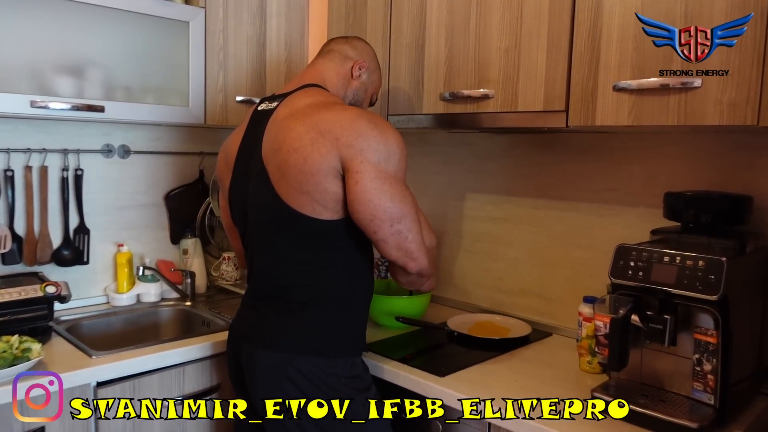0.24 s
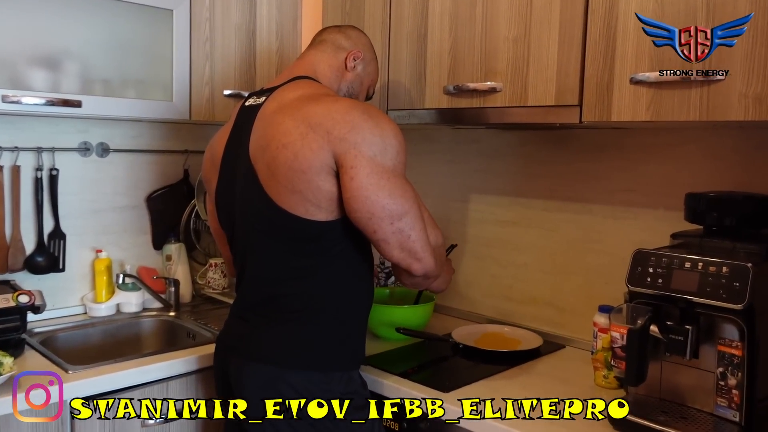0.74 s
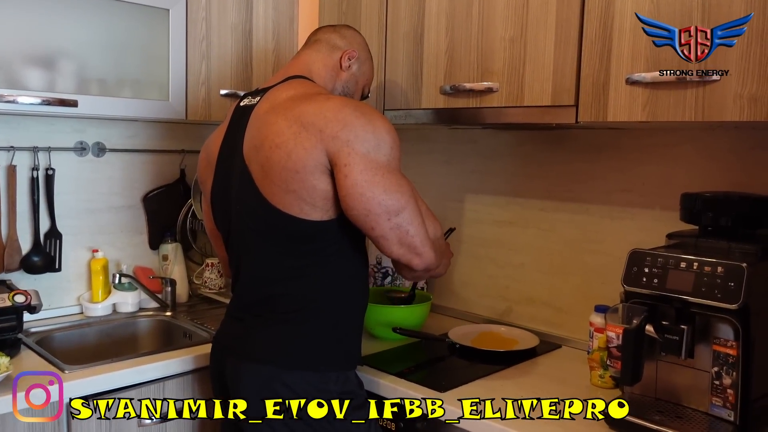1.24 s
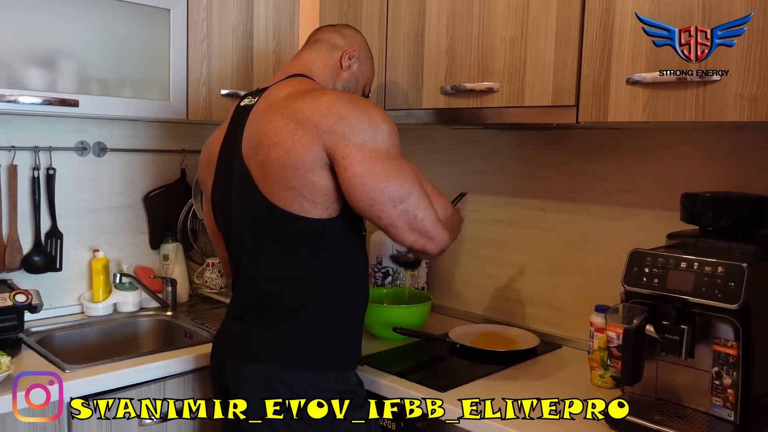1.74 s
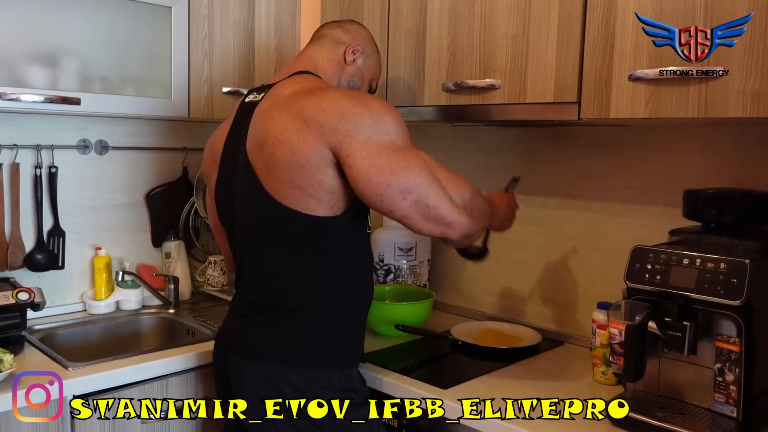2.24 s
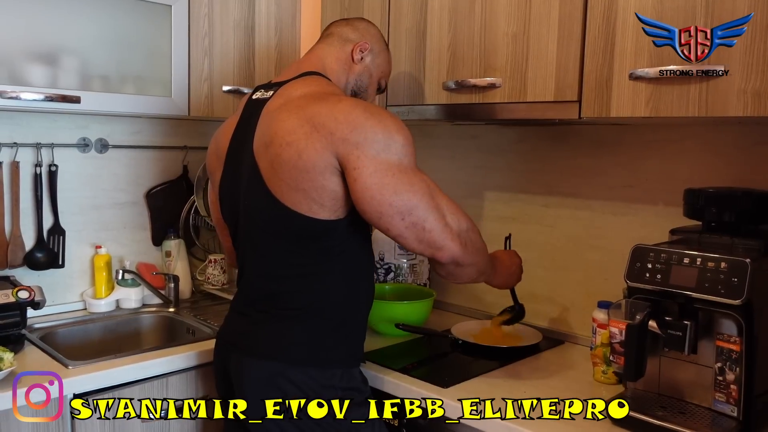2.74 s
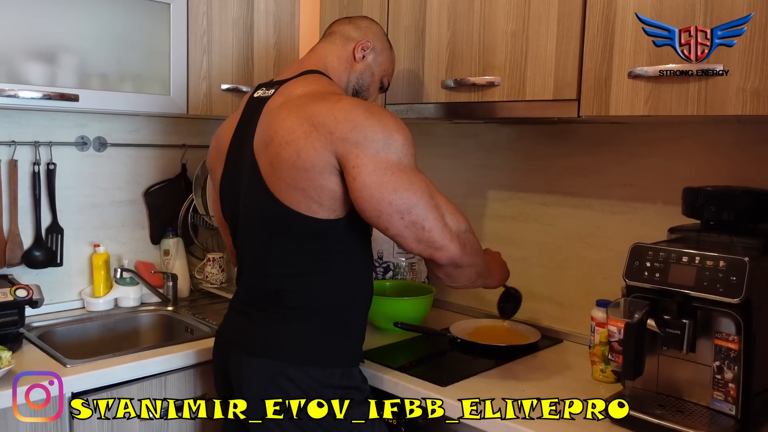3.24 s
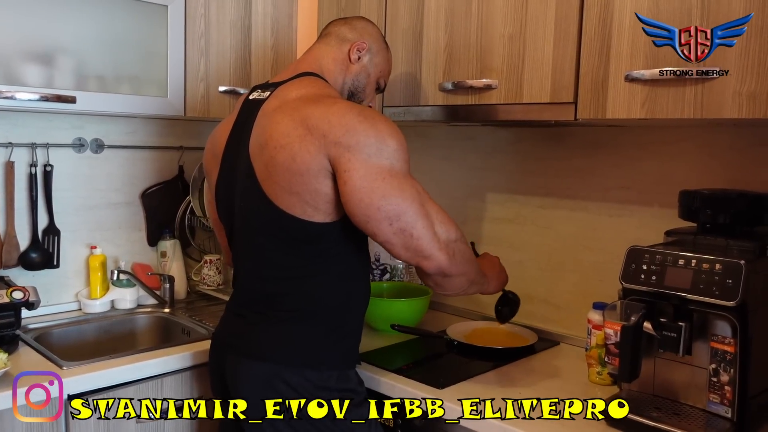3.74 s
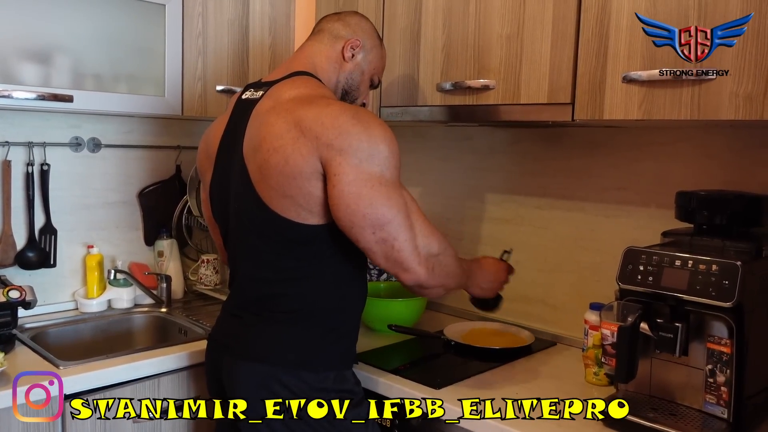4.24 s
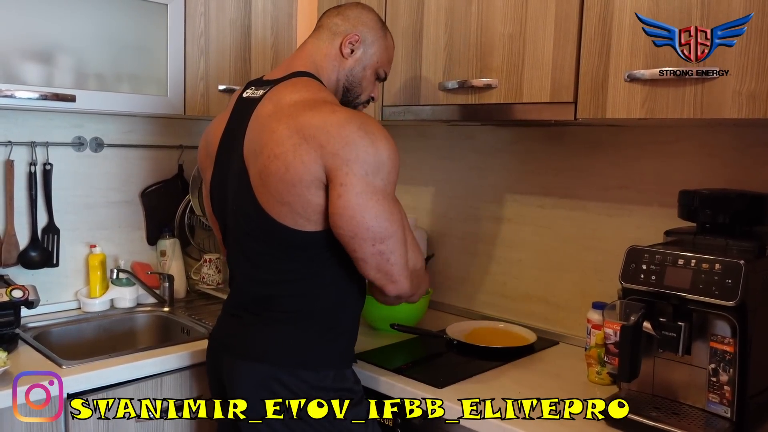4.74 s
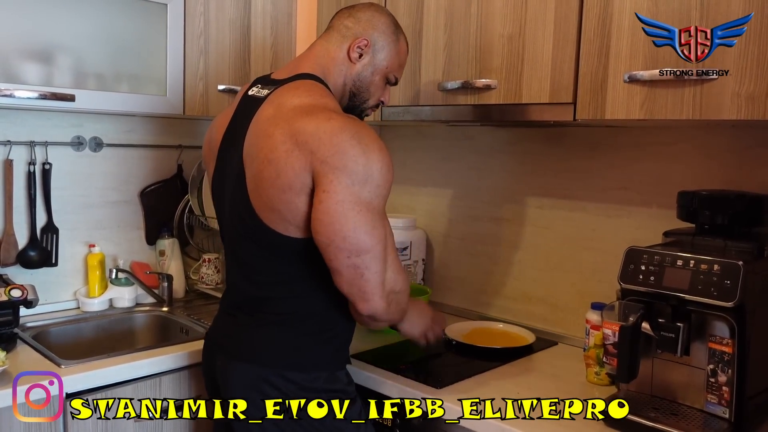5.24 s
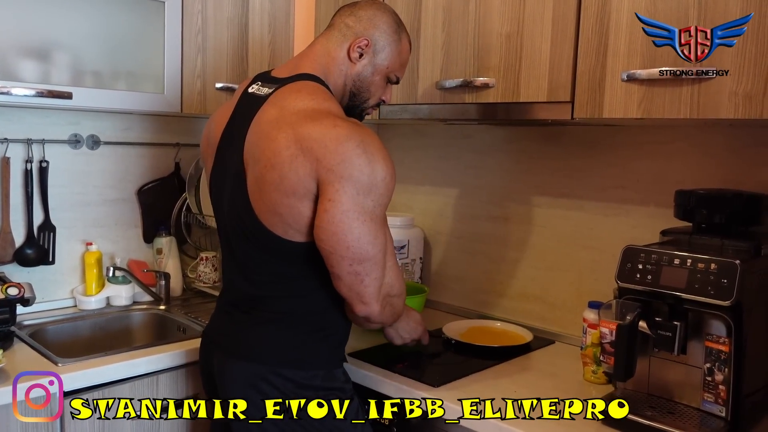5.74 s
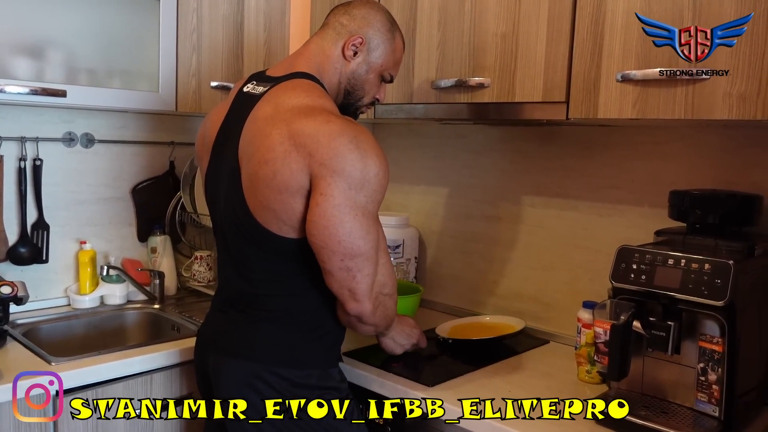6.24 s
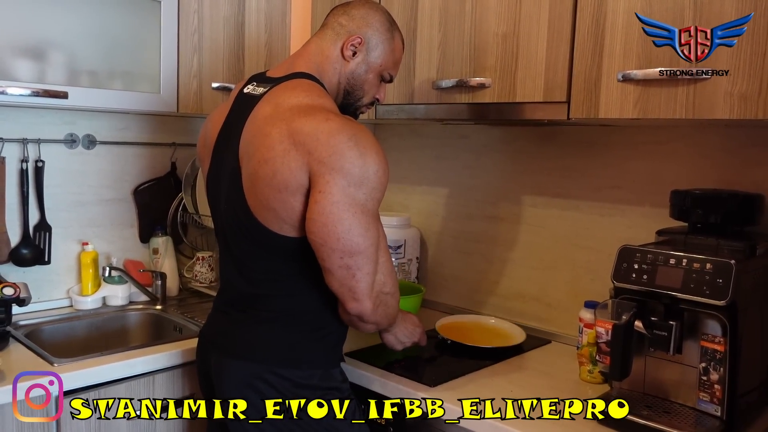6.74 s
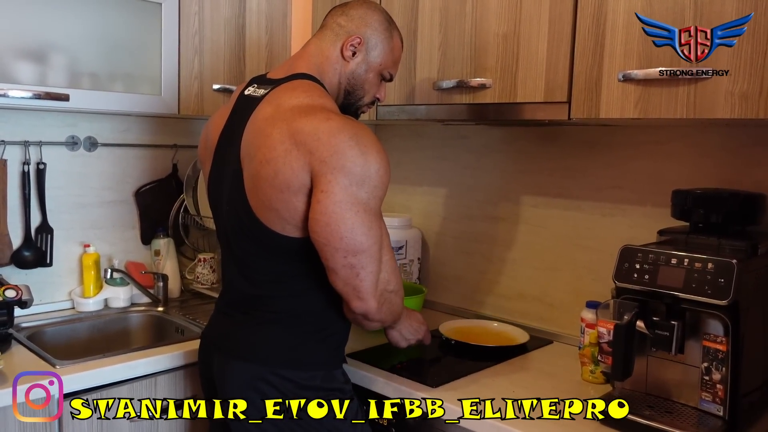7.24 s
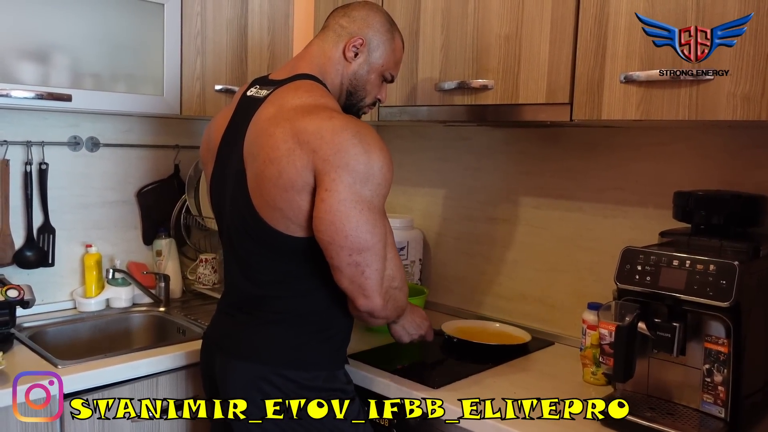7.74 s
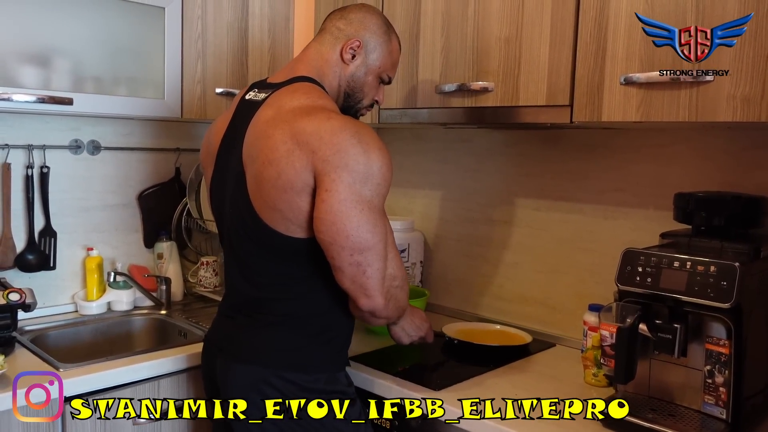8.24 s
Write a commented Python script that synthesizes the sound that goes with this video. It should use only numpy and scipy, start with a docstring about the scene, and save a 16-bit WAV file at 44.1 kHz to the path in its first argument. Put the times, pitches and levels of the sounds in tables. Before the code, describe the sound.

In a small kitchen with short echoes, a close microphone picks up fat crackling and hissing over a steady fan hum. The sizzle surges twice as batter is ladled in, with light taps and a faint squeal of steam. It eases, and the ladle drops into its bowl with a sharp double clack. A few pan knocks on the glass hob follow, one loud, along with another swell of sizzling.

```python
"""A small kitchen, a stereo microphone close to a hot frying pan, a fan humming behind it.
Batter sizzles as thousands of tiny steam bubbles burst; fat spits, the ladle sloshes, scrapes and taps.
A drip and then a ladleful hit the fat and flare up, and steam whistles out from under the batter.
The ladle is dropped back in its bowl, and the pan is tilted to spread the batter and knocks
down on the glass hob. Worktop, cupboards and walls throw back short echoes."""
import sys
import numpy as np
from scipy import signal
from scipy.fft import rfft, irfft
from scipy.io import wavfile
from scipy.ndimage import uniform_filter1d

SR = 44100
rng = np.random.default_rng(int(sys.argv[2]) if len(sys.argv) > 2 else 0)


def master_out(mix):
    """Clip the mix to full scale and print it as 16-bit PCM to the path in sys.argv[1]."""
    frames = np.transpose(np.atleast_2d(mix))
    ceiling = np.clip(frames, -1, 1)
    pcm = np.round(ceiling * 32767).astype(np.int16)
    wavfile.write(sys.argv[1], SR, pcm)


N = 374850
TIME = np.arange(N) / SR

# The kitchen's reverberation: (frequency [Hz], t60 [s])
KITCHEN_DECAY = [(100, 0.97), (400, 0.69), (1500, 0.45), (4000, 0.42), (9000, 0.53), (16000, 0.46)]
# Fan air and the quiet hiss of the pan: (frequency [Hz], relative level [dB])
AIR_SPECTRUM = [(20, -30), (70, -26), (125, -15), (190, -7.5), (290, 1.5), (420, -2), (540, -12.5),
                (950, -16), (1700, -9.5), (2450, -17.5), (5400, -7), (8000, -15), (11000, -17.5),
                (15700, -24.5)]
# Resonances of the fan and its duct: (frequency [Hz], width [Hz], level [dB])
FAN_RESONANCES = [(333.4, 27.6, -46.5), (353.6, 4.5, -54.5), (190, 6.8, -67.5), (421, 15, -58.5),
                  (513, 13, -69.5), (1175, 110, -61.5), (1321, 64, -59), (2936, 460, -57), (3390, 220, -61),
                  (5110, 210, -57.5), (12150, 600, -60)]
# Swells of sizzle from batter on hot fat, and the ladle sloshing through batter near 0.8 s;
# fizz and sputter are boosts before weighting by band:
# (time [s], level [dB], rise [s], hold [s], fade [dB/s], fine fizz [dB], low sputter [dB])
SWELLS = [(-.3, -37.5, 0.083, 0.23, 12.5, 1.5, 9.5), (.78, -46, .05, 0.25, 17, -12, 25.5),
          (1.494, -43.5, 0.19, .05, 14, -8, 13), (2.228, -31.5, 0.04, 0.02, 34, 1.5, 10.5),
          (2.553, -44.5, 0.13, 0.42, 8, -4, 15), (2.998, -31, .045, 0.12, 24, -8, 3.5),
          (3.5, -48.5, 0.13, 0.18, 45, 4, 10), (4.298, -48.5, 0.073, .35, 9, -4, 7),
          (5.35, -47, .1, .1, 11, -6, 22), (6.153, -35, 0.13, 0.15, 45, -5, 10),
          (6.546, -42.5, 0.058, 0.1, 4, 2, 8)]
# Colour of the bursting steam bubbles: (frequency [Hz], relative level [dB])
SIZZLE_SPECTRUM = [(100, -55), (600, -18), (1000, -16.5), (1330, -14), (2020, -9.5), (2430, -11.5),
                   (3520, -3), (4500, -2), (5720, -0.5), (7600, -3), (9200, -4), (11000, -6), (13000, -6.5),
                   (15800, -10)]
# Fat spitting, and light bumps, scrapes and taps of the ladle:
# (time [s], relative level [dB], pitch [Hz], decay [cycles])
SMALL_CLICKS = [(.02, -18, 3050, .7), (.194, -25, 756, 1.1), (.222, -27, 623, 0.72),
                (.218, -18.5, 3170, .7), (.625, -21, 9000, .3), (.84, -23, 7050, 0.44),
                (.927, -20.5, 2600, .47), (1.735, -20, 8000, 0.24), (2.282, -19, 3540, 4),
                (2.49, -16, 4380, 0.62), (2.797, -12.5, 3400, 0.37), (2.902, -16.5, 12000, 0.46),
                (2.945, -22, 11000, .4), (3.24, -18, 12000, .6), (4.741, -16, 9000, .36),
                (4.745, -17, 3420, 0.37), (8.15, -26, 13000, 2)]
# The ladle landing in its bowl:
# (time [s], relative level [dB], contact [ms], first bounce after [s], bounce against blow [dB])
LADLE_LANDINGS = [(1.06, -37, 0.18, .04, -8), (1.22, -22, .17, 0.03, -12), (4.975, -27.5, .067, .02, -18),
                  (5.1025, 3.5, 0.079, .04, -7.5), (5.215, 6, .17, .057, -5)]
# Clack of ladle and bowl: (frequency [Hz], gain [dB])
LADLE_CLACK = [(40, -22), (110, -13.5), (220, -1), (450, -3), (600, -0.5), (850, -0.5), (1080, -7.5),
               (1450, 4.5), (2200, 0.5), (2620, 2.5), (3150, -10), (5500, -5), (10000, -8.5), (16000, -14)]
# Ring of ladle and bowl: (frequency [Hz], relative level [dB], t60 [s])
LADLE_RING = [(199, -42, .18), (334, -40, .21), (565, -38, .1), (813, -44, .18), (940, -40, .1),
              (1287, -36, .17), (1400, -29, .25), (1560, -32, .07), (1776, -30, .06), (2540, -35, .08)]
# Steam squeezing out under the poured batter: (time [s], level [dB], half length [s])
STEAM_JETS = [(3.056, -42, .02), (3.205, -33.5, 0.031), (3.3, -44, .1), (3.4, -32.5, 0.012),
              (3.498, -42.5, 0.054)]
# The pan meeting the hob:
# (time [s], relative level [dB], contact [ms], first bounce after [s], bounce against blow [dB])
PAN_LANDINGS = [(5.69, -16.5, 0.28, 0.036, -9), (5.89, -25, .22, 0.018, -21), (6.278, -7, 0.3, 0.033, -10),
                (6.646, 7.5, 0.09, 0.039, -10), (7.704, -18, 0.042, .03, -17), (8.403, -1, 1.6, 0.039, -1),
                (8.485, -1, 1.2, .04, -8)]
# Clack of the pan on glass: (frequency [Hz], gain [dB])
PAN_CLACK = [(40, -13), (95, -17), (140, -5), (280, 4), (480, -2), (660, 1), (900, -0.5), (1200, 3),
             (2800, 5), (3800, 0.5), (5000, -7.5), (7500, -14), (16000, -61)]
# Ring of the pan: (frequency [Hz], relative level [dB], t60 [s])
PAN_RING = [(253, -40, .35), (355, -41, .3), (646, -41, .25), (820, -43, .3), (1015, -43, .3),
            (1125, -39, .3), (1345, -41, .3), (1749, -41, .3), (1836, -40, .33), (2050, -42, .3),
            (2195, -38, .33), (2432, -40, .3), (2750, -41, .28), (2853, -38, .2), (3101, -42, .22),
            (3591, -35, .11)]
# Stereo width at the microphone: (frequency [Hz], side gain [dB])
SIDE_GAIN = [(100, -5), (300, -19), (600, -4), (2000, -8), (4500, -8), (9000, -8.5), (15000, -10.5)]


def amp(db):
    return 10 ** (np.asarray(db) / 20)


def unit_rms(x):
    return x / np.sqrt(np.mean(x ** 2) + 1e-20)


def curve_at(points, hz):
    point_hz, value = np.transpose(points)
    return np.interp(np.log(hz + 1), np.log(point_hz + 1), value)


def add_at(mix, s, sound):
    part = mix[round(s * SR):][:len(sound)]
    part += sound[:len(part)]


def coloured(x, points):
    """Filters by a spectrum in dB."""
    size = x.shape[-1]
    return irfft(rfft(x) * amp(curve_at(points, np.fft.rfftfreq(size, 1 / SR))), size)


def minimum_phase(db):
    """The briskest impulse response with this gain over the full circle of frequencies."""
    return np.fft.ifft(np.exp(np.conj(signal.hilbert(np.log(amp(db)))))).real


def noise_band(hz, width_hz):
    """Mid and side noise through a steep resonance that follows the curve hz."""
    turn = np.exp(2j * np.pi * np.cumsum(hz * np.ones(N)) / SR)
    pole = np.exp(-np.pi * width_hz / SR)
    band = signal.lfilter([(1 - pole) ** 2], [1, -2 * pole, pole ** 2], rng.standard_normal((2, N)) / turn)
    return unit_rms((turn * band).real)


def kitchen(x, wet_db, near_db, near_t60=0.045):
    """Direct sound, dense echoes off worktop and cupboards, and the room's tail; gives mid and side."""
    t = np.arange(SR // 2) / SR
    early, late = rng.choice([-1, 1], (2, 2, len(t))) * (rng.random((2, 2, len(t))) < .2)
    near = early * amp(-60 * t / near_t60)
    hz, age, spectra = signal.stft(late, SR, nperseg=256)
    decay = amp(-60 * age / curve_at(KITCHEN_DECAY, hz)[:, None])
    tail = signal.istft(spectra * decay, SR, nperseg=256)[1][:, :len(t)]
    tail *= 1 - np.exp(-t / 0.0072)
    echo = amp(near_db) * near / np.linalg.norm(near[0]) + amp(wet_db) * tail / np.linalg.norm(tail[0])
    echo[0, 0] += 1  # the direct path, in the mid only
    # the room spreads sound in time but leaves its broad colour alone
    power = uniform_filter1d(abs(np.fft.fft(echo)) ** 2, size=60, mode="wrap")
    echo = signal.fftconvolve(echo, minimum_phase(-10 * np.log10(power))[:, :2048], axes=1)
    return signal.fftconvolve(x[None], echo, axes=1)[:, :N]


def fan(air_db=-44):
    """Rushing air with the narrow, restless resonances of fan and duct."""
    hz = np.fft.rfftfreq(N, 1 / SR)
    power = (amp(air_db) * unit_rms(amp(curve_at(AIR_SPECTRUM, hz)))) ** 2
    for centre, width, db in FAN_RESONANCES:
        peak = 1 / (1 + (2 * (hz - centre) / width) ** 2)
        power += (amp(db) * unit_rms(peak)) ** 2
    return irfft(rfft(rng.standard_normal((2, N))) * np.sqrt(power), N)


def swell_levels(t, simmer_db=-48.5, sputter_lag_db=31, sputter_lag_s=0.096):
    """The simmer, then each swell as it rises, holds and fades: (level, fizz, sputter) over time."""
    steady = np.ones(len(t))
    layers = [np.outer((simmer_db, -26, 13), steady)]  # little fizz, plenty of sputter
    for s, db, rise_s, hold_s, fade_db_per_s, fizz_db, sputter_db in SWELLS:
        age = np.maximum(t - s, 0)
        risen_db = 20 * np.log10(np.clip(age / rise_s, 1e-5, 1))
        faded_db = fade_db_per_s * np.maximum(age - rise_s - hold_s, 0)
        # big bubbles take time to grow, so a fresh swell lacks low sputter
        young_db = sputter_lag_db * np.exp(-age / sputter_lag_s)
        layers.append([db + risen_db - faded_db, fizz_db * steady, sputter_db - young_db])
    return np.array(layers)


def sizzle(bursts_per_s=5000, spread_db=3.0, flutter_db=1.43):
    """Tiny steam bubbles burst, brighter under fresh batter; one dull swell is the ladle's slosh."""
    size = amp(spread_db * np.minimum(rng.exponential(1, N), 6)) * rng.choice([-1, 1], N)
    bursts = kitchen(size * (rng.random(N) < bursts_per_s / SR), wet_db=-0.5, near_db=3.5)
    hz, t, spectra = signal.stft(unit_rms(coloured(bursts, SIZZLE_SPECTRUM)), SR, nperseg=512)
    fizz_weight = curve_at([(7500, 0.028), (13000, 0.93)], hz)[:, None]
    sputter_weight = curve_at([(2600, 0.53), (4200, 0)], hz)[:, None]
    power = sum(amp(db + fizz_weight * fizz + sputter_weight * sputter) ** 2
                for db, fizz, sputter in swell_levels(t))
    flutter = unit_rms(uniform_filter1d(rng.standard_normal(len(t)), size=5))
    return signal.istft(spectra * np.sqrt(power) * amp(flutter_db * flutter), SR, nperseg=512)[1][:, :N]


def crackle(limit_db=-36, ticks_per_s=60, spread_db=3.0, below_db=-9.5):
    """Single droplets of fat snap above the hiss, louder as it swells, up to a limit."""
    size = amp(spread_db * np.minimum(rng.exponential(1, N), 3.5)) * (rng.random(N) < ticks_per_s / SR)
    ticks = coloured(size * rng.choice([-1, 1], N), [(500, -50), (2500, -2), (6000, -2), (16000, 0)])
    t = TIME[::256]
    level = np.sqrt(sum(amp(db + .5 * fizz) ** 2 for db, fizz, _ in swell_levels(t)))
    swell = amp(below_db) * np.interp(TIME, t, np.minimum(level, amp(limit_db)))
    return kitchen(unit_rms(ticks) * swell, wet_db=-12, near_db=19)


def small_clicks(spray_s=0.0022):
    """Each spit of fat or light touch of the ladle is a short spray of damped clicks."""
    out, t = np.zeros(N), np.arange(SR // 8) / SR
    for s, db, hz, cycles in SMALL_CLICKS:
        click = t * np.cos(2 * np.pi * hz * t) * np.exp(-hz * t / cycles)
        spray = signal.fftconvolve(np.diff(click), rng.standard_normal(len(t)) * np.exp(-t / spray_s))
        add_at(out, s, amp(db) * spray / np.linalg.norm(spray))
    return amp(8.0) * kitchen(out, wet_db=4.5, near_db=12)


def bouncing(landings, edge_s, edge_db, edge_contact, soft_ms, softening, loss_db, gap_ratio=.38):
    """A main blow, another edge's touch, three quickening bounces: (time [s], level [dB], contact [ms])."""
    blows = []
    for s, db, contact_ms, gap_s, bounce_db in landings:
        blows += [(s, db, contact_ms), (s + edge_s, db + edge_db, contact_ms * edge_contact)]
        for k in range(3):
            s += gap_s * gap_ratio ** k
            blows.append((s, db + bounce_db - loss_db * k, contact_ms + soft_ms * softening ** k))
    return blows


def knocks(blows, body, modes, ring_db, chatter, chatter_s=0.0033):
    """Chattering force pulses, duller the longer the contact, drive a short clack and ringing modes."""
    force, t = np.zeros(N), np.arange(SR // 2) / SR
    brief = t[:600]
    for s, db, contact_ms in blows:
        progress = np.pi * brief * 1000 / contact_ms
        push = progress * np.exp(-progress)
        rebounds = rng.standard_normal(len(brief)) * np.exp(-brief / chatter_s)
        rebounds *= chatter / np.linalg.norm(rebounds)
        rebounds[0] += 1
        scatter = irfft(np.exp(1j * np.angle(rfft(rebounds))))  # smears the blow without colouring it
        add_at(force, s, amp(db) * np.convolve(push / push.sum(), scatter))
    clack = minimum_phase(curve_at(body, abs(np.fft.fftfreq(len(t), 1 / SR))))
    ring = sum(amp(db - 60 * t / t60) * np.cos(2 * np.pi * hz * t) for hz, db, t60 in modes)
    return signal.fftconvolve(force, clack + amp(ring_db) * ring)[:N]


def ladle():
    """The ladle clatters into its bowl, each bounce duller than the last, and both ring briefly."""
    blows = bouncing(LADLE_LANDINGS, edge_s=-.0053, edge_db=-4.5, edge_contact=0.49,
                     soft_ms=0.29, softening=1.94, loss_db=0.0)
    clatter = knocks(blows, LADLE_CLACK, LADLE_RING, ring_db=-14.0, chatter=1.37)
    return amp(15.5) * kitchen(clatter, wet_db=3.5, near_db=8.0, near_t60=0.041)


def steam(whistle_hz=5850, rise_hz=490, rise_at_s=3.29, rise_s=0.046, rush_db=-42):
    """Jets whistle and rise as the batter sets, under a brief higher rush while the ladleful spreads."""
    hz = whistle_hz + rise_hz * (1 + np.tanh((TIME - rise_at_s) / rise_s)) / 2
    jets = sum(amp(db) * np.exp(-((TIME - s) / half_s) ** 2) for s, db, half_s in STEAM_JETS)
    whistle = noise_band(hz, width_hz=700)
    rush = noise_band(hz=9200, width_hz=2400)
    spreading = np.interp(TIME, [3.02, 3.06, 3.22, 3.45], [0, 1, 1, 0])
    return whistle * jets + amp(rush_db) * rush * spreading


def pan():
    """The tilted pan knocks and bounces on the glass hob: a clack, a faint ring and plenty of room."""
    blows = bouncing(PAN_LANDINGS, edge_s=.009, edge_db=-12.5, edge_contact=1.5,
                     soft_ms=0.13, softening=0.62, loss_db=0.8)
    clatter = knocks(blows, PAN_CLACK, PAN_RING, ring_db=-32, chatter=0.34)
    return amp(15.5) * kitchen(clatter, wet_db=10.5, near_db=13.5, near_t60=0.14)


def scene(knock_side_db=-6.5, lean_left_db=.2):
    """All sources meet at the microphone as mid and side, the knocks nearly mono; gives left and right."""
    cookware = (ladle() + pan()) * amp([[0], [knock_side_db]])
    mid, side = fan() + sizzle() + crackle() + small_clicks() + steam() + cookware
    side = coloured(side, SIDE_GAIN)
    return np.array([mid + side, mid - side]) * amp([[lean_left_db], [-lean_left_db]])


def record(dry, low_cut_hz=87.6, band_limit_hz=15850):
    """The microphone's bass roll-off and the band limit of the recorder."""
    thin = signal.sosfilt(signal.butter(2, low_cut_hz, "high", fs=SR, output="sos"), dry)
    lowpass = signal.firwin(1023, band_limit_hz, window=("kaiser", 9), fs=SR)
    return signal.oaconvolve(thin, lowpass[None], "same")


dry = scene()
out = record(dry)
master_out(out)
```